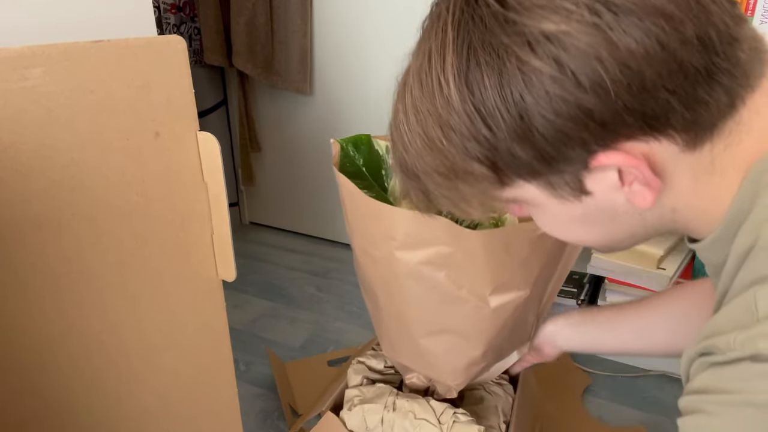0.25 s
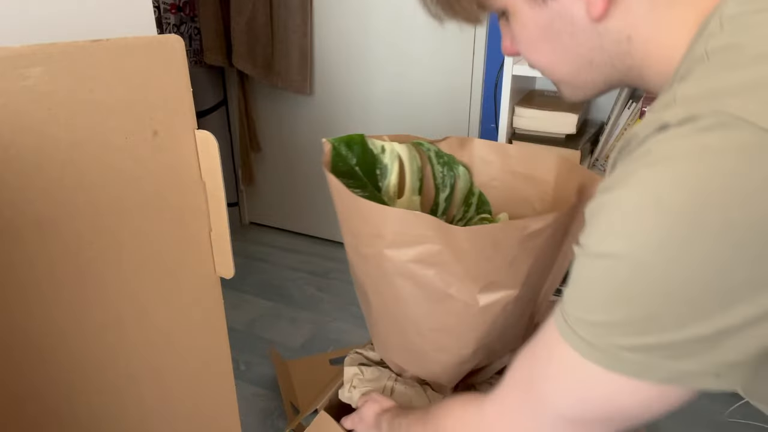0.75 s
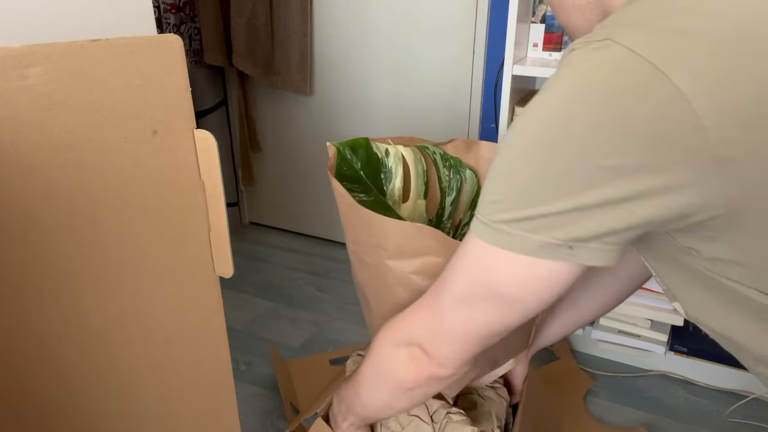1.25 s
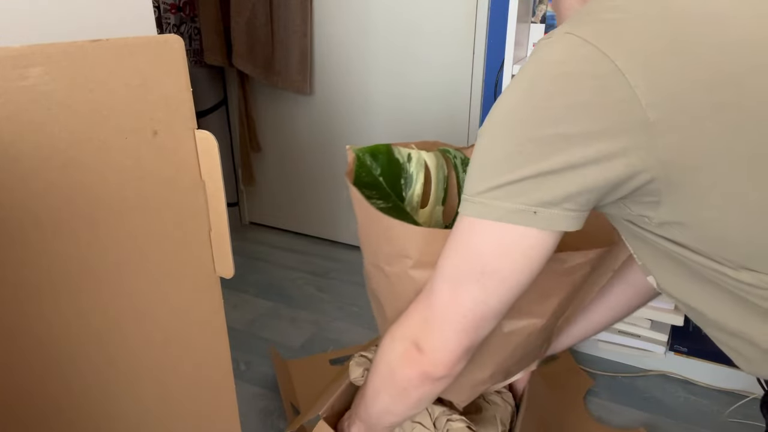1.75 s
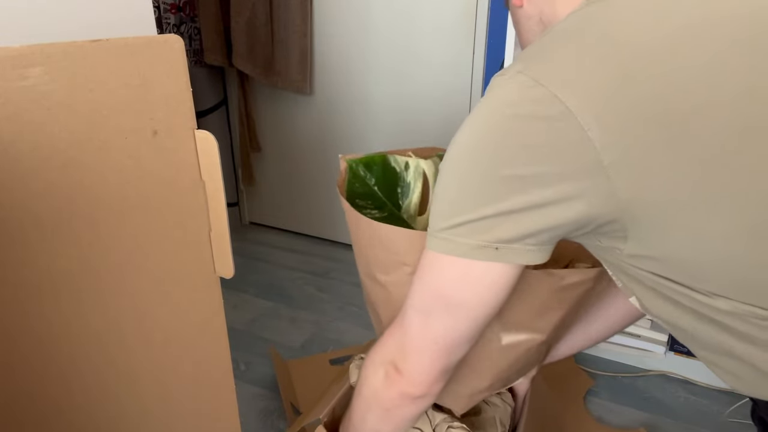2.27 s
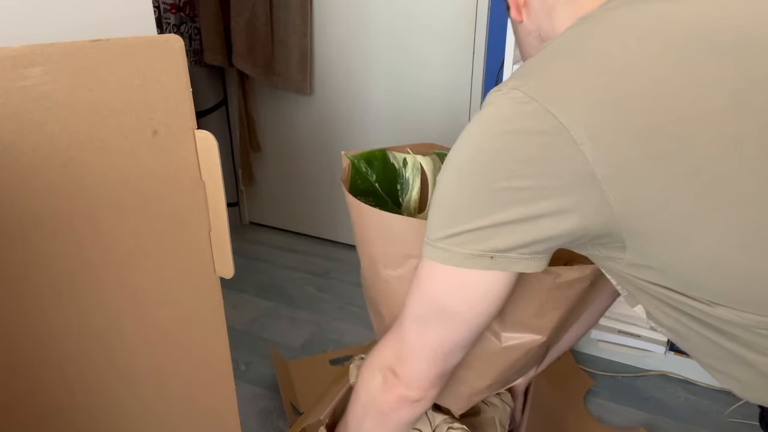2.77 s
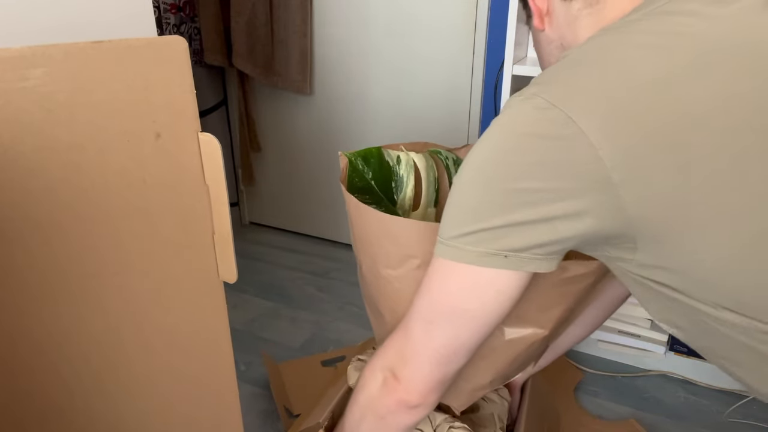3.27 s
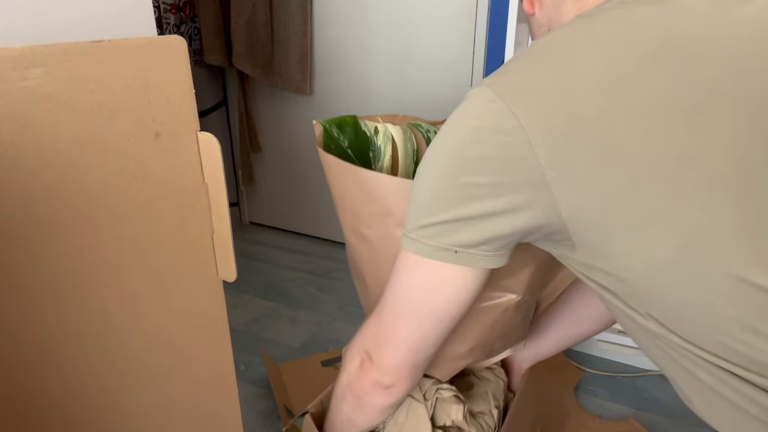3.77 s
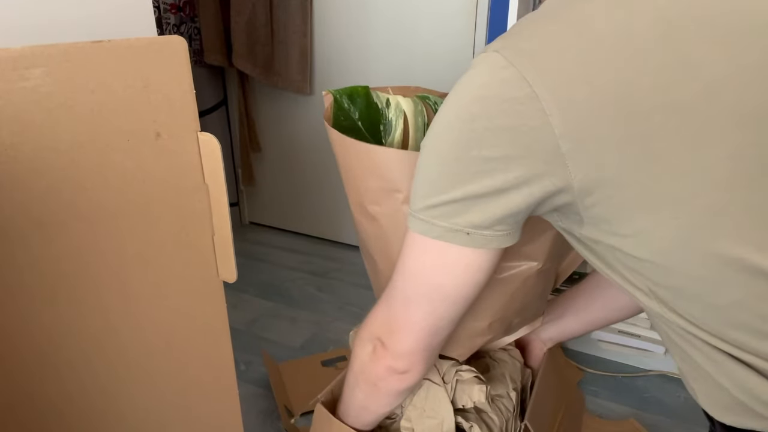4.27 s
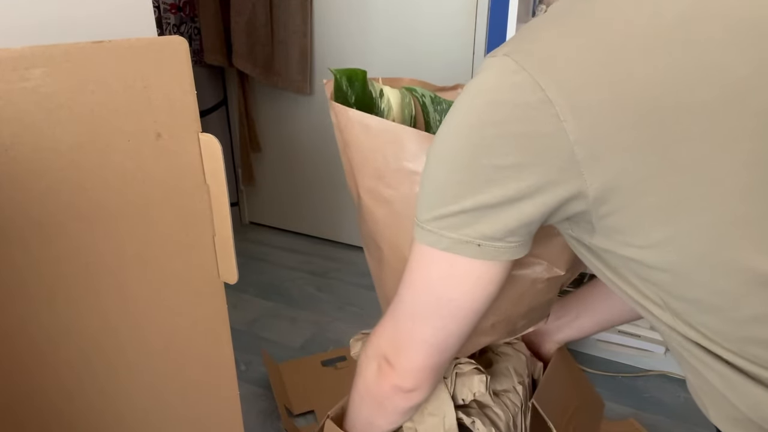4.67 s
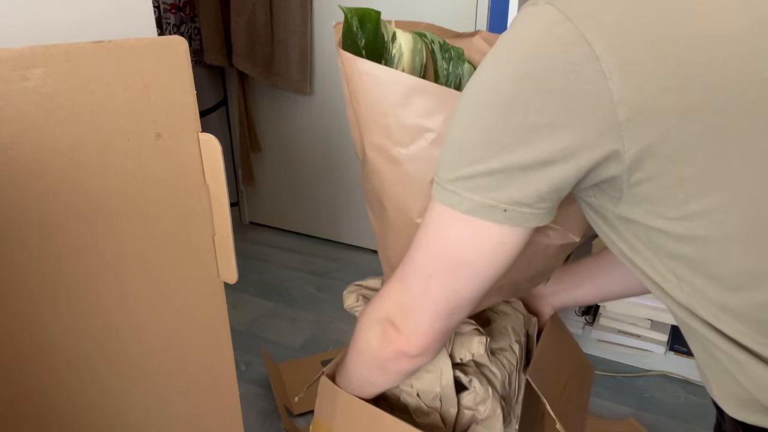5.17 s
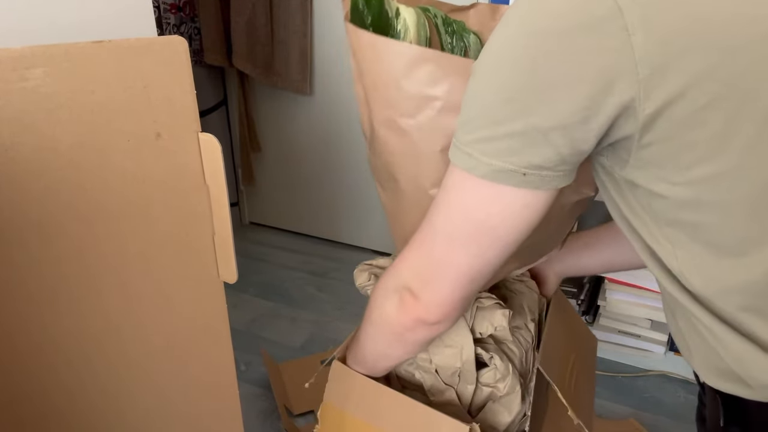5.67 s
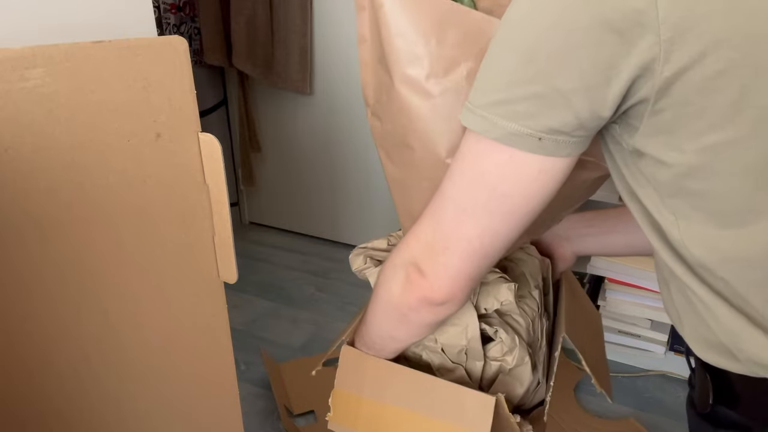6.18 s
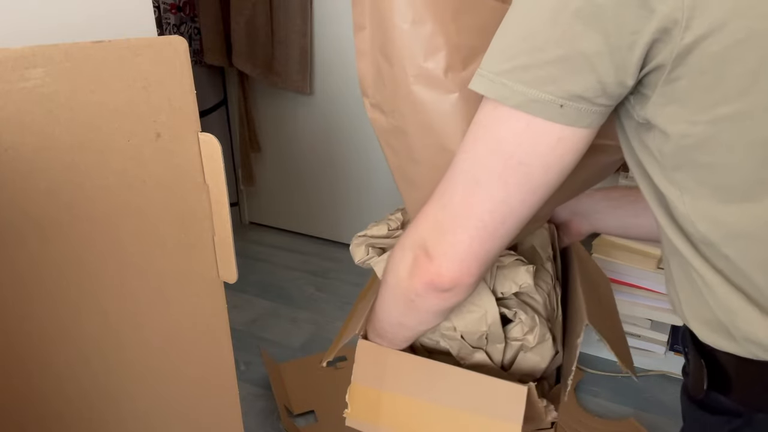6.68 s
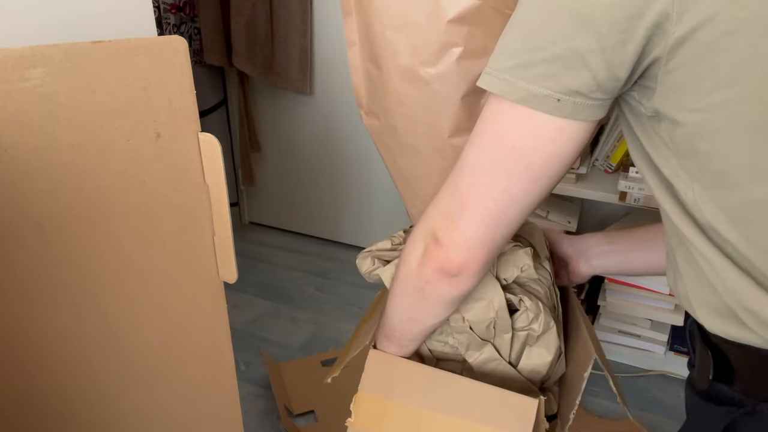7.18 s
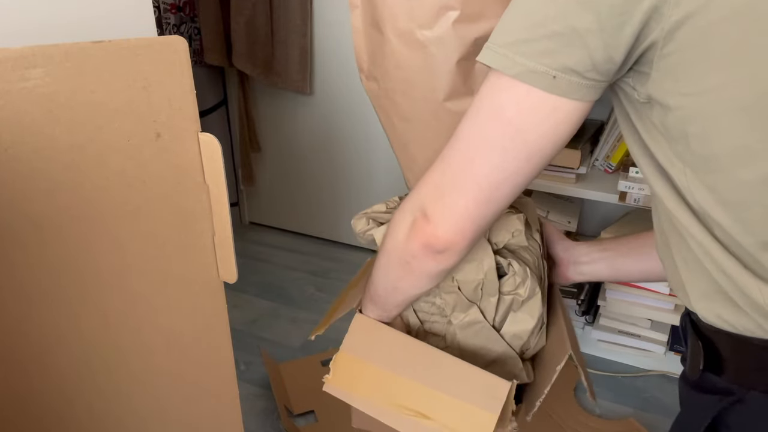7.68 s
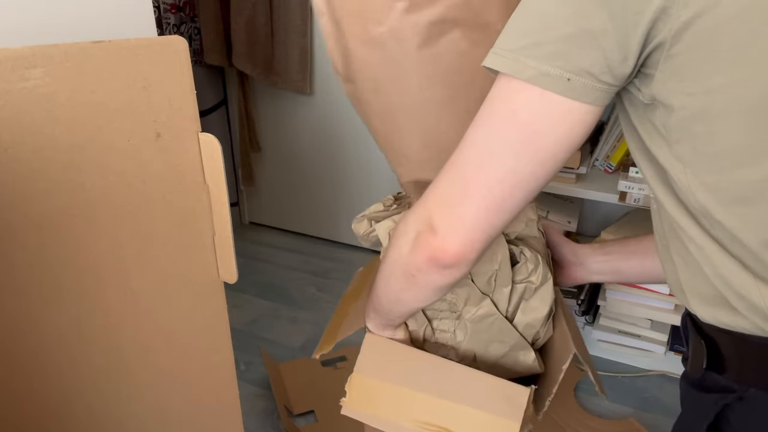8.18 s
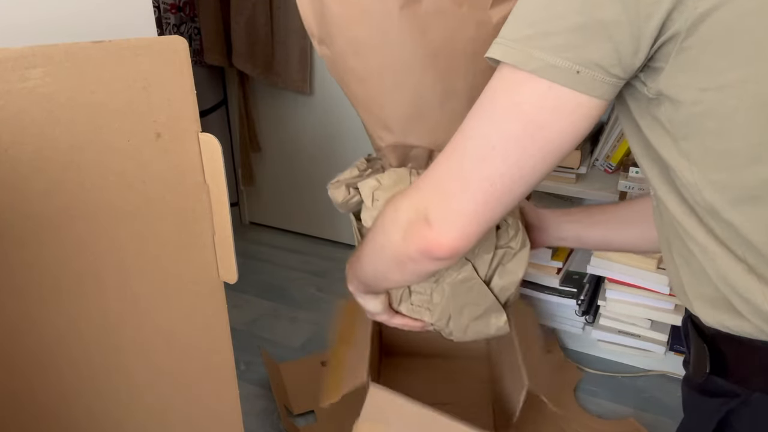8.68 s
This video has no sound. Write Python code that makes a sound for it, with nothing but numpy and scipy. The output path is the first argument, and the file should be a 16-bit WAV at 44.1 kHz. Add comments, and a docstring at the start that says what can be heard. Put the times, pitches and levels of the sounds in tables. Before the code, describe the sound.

Stiff packing paper crinkles continuously but unevenly, in short squeezes and sharp snaps, as someone works a wrapped plant out of a carton. A firmer bump and crunch come early, then quieter rustling with brief lulls. Finally the cardboard box slips free and lands with one strong, boxy thud, rocking slightly. Heard up close in stereo, indoors, with a short room reflection and very low background hiss.

```python
"""In a small room, two hands dig through crumpled packing paper in a cardboard box, which at last drops on the floor.
Paper: random buckling impulses excite banks of resonators over sliding noise; snaps are decaying noise bursts,
and flipping patches are damped tones of sinking pitch.
Box: filtered noise rumbles in the walls; knocks, the last ones landing and rocking, excite damped panel modes.
Decaying random reflections form the room, and a close pair of microphone ports hears it over a faint room tone."""
import sys
import numpy as np
from scipy import signal
from scipy.fft import rfft, irfft
from scipy.io import wavfile
from scipy.ndimage import uniform_filter1d

SR = 44100
rng = np.random.default_rng(int(sys.argv[2]) if len(sys.argv) > 2 else 0)


def wav_record(signal):
    """Record a signal, one row per channel, as 16-bit PCM in the file named by sys.argv[1]."""
    frames = np.transpose(np.atleast_2d(signal))
    bounded = np.clip(frames, -1, 1)
    # unit amplitude maps onto the largest positive 16-bit level
    quanta = np.round(bounded * 32767).astype(np.int16)
    wavfile.write(sys.argv[1], SR, quanta)


N = 394254

# spectrum of the room tone: (f/Hz, relative level/dB)
ROOM_TONE_SPECTRUM = [(60, 4), (300, -2.5), (1340, 8), (4000, -15.5), (8000, -21), (11000, -8),
                      (16000, -15)]
ROOM_TONE_DB = -58    # rms ahead of the port filters
# response of the port pair to the sum: (f/Hz, level/dB); the ports are out of phase near 8 and 15 kHz
SUM_RESPONSE = [(40, -0.5), (6300, 0.5), (7970, -10.5), (8930, -3.5), (10500, 0), (13700, -0.5),
                (14400, -32), (15100, -55), (16400, -55)]
# response of the port pair to the difference: (f/Hz, level/dB)
DIFFERENCE_RESPONSE = [(40, -18.5), (125, -10), (500, -3.5), (2000, -2), (5000, 0.5), (7000, 4.5),
                       (8500, 1), (10000, 3), (11000, -29), (12800, -24), (13600, 4.5), (14500, 0),
                       (16000, 4)]
# balance of the ports: (f/Hz, left minus right level/dB)
PORT_BALANCE = [(60, 3.5), (180, 2.5), (550, 0.5), (1650, 0.5), (4970, 4), (11000, 0), (14000, 0),
                (16500, -0.5)]
MIC_CUT_HZ, STOP_HZ, CEILING = 58, 16500, 0.85    # high-pass; stop-band edge; limit of the rounded peaks

ROOM_T60_S, WALL_CUT_HZ = 0.21, 22000    # decay and low-pass of the reflections
PAPER_ROOM_DB, KNOCK_ROOM_DB = -6.5, -9.5    # reflections against direct sound
KNOCK_SIDE_DB = -4    # knocks are more alike at both ports

# spectrum of the wall rumble: (f/Hz, relative level/dB per Hz)
RUMBLE_SPECTRUM = [(15, -58), (25, 17), (64, 2), (75, 5.5), (163, 1), (198, -1), (252, -0.5), (291, -15.5),
                   (366, -3), (450, -22), (580, -49), (990, -120)]
WALL_DB, WALL_FOLLOWS = -50, 0.48    # rumble at the mean rustle level; share of the rustle's swing in dB
SHAKE_DB, SHAKE_T60_S, SHAKE_CUT_HZ = -11, 0.23, 160    # rumble after a knock, weaker from higher panels
# modes of the box: (f/Hz, relative level/dB, free t60/s)
BOX_MODES = [(80.9, 1.5, 0.65), (108, 11, 0.088), (146.7, 3, 0.16), (165.3, -1, 0.29), (175, 10.5, 0.068),
             (230, 13.5, 0.036), (268.7, 14.5, 0.049), (283, 9, 0.081), (330, 4, 0.049), (420, -0.5, 0.046),
             (550, -6, 0.085), (576, 0.5, 0.09), (700, -3.5, 0.17), (967, 1, 0.088), (1130, -10, 0.046)]
# knocks on the box, last its landing and rocking:
# (t/s, relative level/dB, struck panel f/Hz, spread of modes/octaves, share of free t60)
KNOCK_EVENTS = [(0.099, -26.5, 82, 1.2, 0.7), (0.123, -33, 201, 0.44, 1.16), (0.147, -42, 170, .6, 0.68),
                (0.172, -35, 250, 0.53, 0.71), (0.195, -39, 97, 0.78, 0.89), (0.273, -34, 83, 0.42, 0.65),
                (1.254, -41, 229, 0.87, 1), (1.346, -27.5, 92, 0.24, 0.75), (1.519, -28, 144, 0.45, 0.66),
                (1.625, -13, 260, 0.54, 0.83), (1.632, -22.5, 149, 0.42, 0.64),
                (1.661, -27, 270, 0.36, 0.68), (1.703, -30, 191, 0.61, 0.63), (1.7, -27.5, 103, 0.48, 0.82),
                (1.803, -24.5, 170, 0.68, 0.92), (1.826, -25, 170, 0.5, .6), (1.851, -47, 140, 0.57, 0.62),
                (1.956, -20.5, 101, 0.32, 0.47), (1.992, -30, 85, 0.34, 0.53), (2.653, -38.5, 163, 1, 0.84),
                (2.996, -17.5, 168, 0.7, 0.58), (3, -19, 300, 0.21, 0.83), (4.152, -40, 238, 1.1, 0.87),
                (4.247, -36, 230, .27, 1.1), (4.881, -42, 124, 0.64, 0.6), (5.39, -29, 128, 0.64, 0.47),
                (6.915, -30, 70, 1.6, 0.87), (7.542, -39, 242, 0.34, 1), (8.18, -31, 91, 0.44, .6),
                (8.314, -33, 109, 0.36, 1.3), (8.322, -41, 160, 0.77, 0.4), (8.682, -10, 523, 1.7, 1.3),
                (8.686, -3, 183, 0.34, 0.64), (8.691, -23, 400, 0.26, 0.68),
                (8.701, -12.5, 110, 0.29, 1.05), (8.708, -4, 288, 0.39, 0.74), (8.726, -19, 105, .3, 0.66),
                (8.741, -20, 320, 0.42, 0.87), (8.754, -18, 90, 0.45, 0.62), (8.764, -18, 990, 0.5, 1.5),
                (8.801, -18, 105, 0.2, 1), (8.818, -20, 107, 0.18, 0.69), (8.844, -28, 99, 0.57, 0.56),
                (8.894, -28, 92, 0.3, 0.38)]
PANEL_SHARP, PANEL_SAG_S = 0.296, 0.0105    # initial excess of pitch as a share; its time constant

# steady digging: (t/s, rustle level/dB, crackle against rustle level/dB)
DIGGING_LEVELS = [(0, -47.5, -3), (.6, -49.5, 1), (1.05, -45, -2), (1.8, -48.5, -3), (1.93, -49, -5),
                  (2.02, -52, -0.5), (2.25, -47, -2.5), (2.95, -59.5, 0.5), (3.1, -61, 1.5),
                  (3.3, -54.5, -10), (4.4, -44, -2.5), (4.65, -48.5, -9), (4.9, -57, -2.5),
                  (5.066, -66, -5), (5.2, -51.5, 0), (6.05, -55, -5), (6.4, -54, -3.5), (6.48, -48.5, -16),
                  (7.1, -49.5, -4), (7.33, -49, -5), (7.68, -47, -0.5), (8.04, -52.5, -7),
                  (8.35, -52, -1.5), (8.5, -44, -1), (8.61, -62, -1), (8.68, -74, -2.5), (8.86, -56.5, -1),
                  (8.94, -57, 0)]
# squeezes of the hands: (peak t/s, rustle level/dB, length/s, crackle against rustle level/dB)
SQUEEZE_EVENTS = [(0.109, -37.5, 0.1, -23), (0.18, -40.5, 0.12, -25), (0.311, -40.5, 0.12, -5),
                  (0.43, -38.5, 0.18, -3.5), (0.688, -39.5, 0.078, 4), (0.767, -39, 0.074, -1.5),
                  (1.167, -42, 0.11, -7.5), (1.243, -43.5, 0.35, -12), (1.35, -44.5, 0.21, 4),
                  (1.525, -46.5, 0.089, 4.5), (1.604, -32, .1, -4.5), (1.818, -36.5, 0.098, -6.5),
                  (2.112, -39, 0.16, -4), (2.333, -45, 0.15, -3.5), (2.496, -43.5, 0.33, -1),
                  (2.683, -48.5, 0.11, -4.5), (2.772, -54, 0.14, -21), (2.866, -47, 0.3, -2.5),
                  (3.001, -36, 0.065, -6.5), (3.188, -46.5, 0.14, 1.5), (3.297, -43, 0.28, -5.5),
                  (3.49, -45.5, 0.35, -6), (3.658, -40.5, 0.41, -1.5), (3.76, -47.5, 0.56, -0.5),
                  (3.919, -39, 0.11, -3), (4.096, -44.5, 0.081, 5.5), (4.224, -48, 0.12, -27),
                  (4.324, -41.5, 0.12, -23), (4.404, -44.5, 0.18, -1), (4.51, -42, 0.39, -4),
                  (4.733, -40, 0.2, -2.5), (4.856, -39, 0.13, -5.5), (4.965, -42, 0.18, -9.5),
                  (5.144, -41.5, 0.12, -4.5), (5.327, -45.5, 0.24, 1), (5.443, -44.5, 0.2, 0),
                  (5.564, -45, 0.18, -0.8), (5.74, -50.5, 0.56, -2), (6.022, -48, 0.2, -0.5),
                  (6.147, -44, 0.23, -1), (6.277, -41, 0.15, -6), (6.572, -47, 0.4, 3),
                  (6.695, -37.5, 0.13, -2.5), (6.938, -38, 0.41, -1), (7.132, -42.5, 0.13, -4),
                  (7.206, -39.5, 0.15, -2), (7.508, -40, 0.19, -2), (7.647, -61, 0.1, -14),
                  (7.743, -40, 0.4, -4), (7.958, -40.5, 0.14, -1.5), (8.172, -38, 0.26, 2),
                  (8.319, -49, 0.12, 4), (8.532, -50, 0.096, 6.5), (8.702, -31, 0.059, -4.5),
                  (8.788, -37.5, 0.16, -9.5)]
RISE_SHARE, EDGE_DB, SLOPE_POWER = 0.45, 19.5, 1.59    # share of length spent rising; fall at the ends; curvature

# spectrum of the large sheet patches: (f/Hz, relative level/dB per Hz)
RUSTLE_SPECTRUM = [(150, -25.5), (250, 2), (291, -5.5), (365, -0.5), (543, 2.5), (735, 0.5), (1000, 3.5),
                   (1710, -3), (2400, -10), (3120, -14), (5280, -43)]
# spectrum of the small facets and creases: (f/Hz, relative level/dB per Hz)
CRACKLE_SPECTRUM = [(820, -5.5), (1400, 3.5), (1700, -1), (3120, 0), (5500, -2), (6290, -3), (8000, -2.5),
                    (10900, -5), (13600, -8.5), (16400, -11)]
# pitch around which patches gain or lose level: (t/s, f/Hz, lift level/dB)
FAVOURED_PITCHES = [(0, 1010, 4), (.12, 600, 5), (.55, 831, 2.5), (.89, 625, 1), (1.34, 900, -3),
                    (1.6, 600, 13.5), (1.69, 464, 9), (1.8, 696, 7), (3.21, 575, 8), (3.29, 958, 3),
                    (3.44, 565, -1), (3.83, 780, 7), (3.88, 627, 0), (4.35, 700, 2.5), (4.45, 1200, 2),
                    (4.6, 1200, -2), (4.75, 1260, 8.5), (5.0, 1230, 3.5), (5.15, 1250, -1), (5.3, 755, 5),
                    (6.3, 840, 5), (6.7, 710, 1.5), (7.5, 770, 2), (7.55, 597, 1), (8.34, 915, 10.5),
                    (8.39, 654, 12.5), (8.54, 816, 11), (8.69, 460, 13), (8.94, 830, -5)]
FAVOURED_OCTAVES = 0.21    # width of that lift
# treble of the paper, raised or lowered by a broad shelf: (t/s, level/dB)
TREBLE_LEVELS = [(0, 2.5), (.5, 1), (1, 0), (2, 3.5), (2.9, 0), (3.2, -3), (3.5, -3), (4, 0), (4.5, -2.5),
                 (5, 1), (6, -1), (6.5, -1.5), (7, -1.5), (7.7, 0.5), (8, 0), (8.2, -6.5), (8.5, -1),
                 (8.94, 1)]

# flat patches that flip: (t/s, relative level/dB, settled f/Hz)
POP_EVENTS = [(.099, -16, 654), (.199, -21.5, 394), (.2017, -27, 1485), (0.314, -29.5, 560),
              (.416, -20.5, 642), (.68, -28, 586), (.753, -32, 500), (.839, -26.5, 547), (1.236, -27, 1140),
              (1.341, -24, 360), (1.401, -21.5, 700), (1.482, -24, 960), (1.526, -17.5, 517),
              (1.58, -19, 603), (1.596, -24, 980), (1.602, -29, 555), (1.624, -9.5, 371), (1.802, -18, 667),
              (2.095, -22, 396), (2.305, -25, 494), (2.482, -26, 840), (2.741, -29, 664), (2.762, -20, 576),
              (2.855, -26, 576), (2.998, -18.5, 660), (3.163, -28, 440), (3.281, -26, 970),
              (3.417, -22.5, 567), (3.61, -29, 885), (3.882, -23, 540), (4.079, -24, 648),
              (4.2515, -30, 1310), (4.266, -35, 1600), (4.302, -22, 716), (4.311, -24, 420),
              (4.483, -31, 1200), (4.6, -31, 1190), (4.69, -27, 1220), (4.735, -30, 1280),
              (4.851, -26, 1210), (4.856, -24, 570), (4.878, -28, 1195), (4.882, -26, 590),
              (4.945, -33.5, 1180), (5.134, -27, 1210), (5.755, -26.5, 740), (6.018, -29.5, 1476),
              (6.53, -30.5, 546), (6.567, -28, 1215), (6.646, -25.5, 586), (6.69, -24, 904),
              (6.9151, -20.5, 894), (6.926, -31, 1034), (6.973, -34, 1116), (7.098, -25, 866),
              (7.463, -28, 1094), (7.526, -28, 590), (7.629, -20, 700), (7.643, -29, 590),
              (7.792, -22, 667), (8.684, 2, 500), (8.693, -6, 420), (8.744, -15, 340), (8.764, -21, 1030),
              (8.778, -23, 1000)]
POP_T60_S, POP_SHARP, POP_SAG_S = 0.048, 0.13, 0.0031    # decay; initial excess of pitch; its time constant
# creases that snap: (t/s, relative crack level/dB, relative sheet level/dB, shower t60/s,
# shower against crack level/dB, facet f/Hz)
SNAP_EVENTS = [(0.0862, -33, -28.5, 0.1, -14, 3700), (0.0977, -38, -27, 0.065, -17, 2020),
               (0.169, -40, -33, 0.11, -12, 2200), (0.2012, -29.5, -41, 0.1, -10, 10900),
               (0.2903, -34, -39, 0.14, -7, 1930), (0.3461, -43, -43, 0.12, -11, 5590),
               (0.4116, -30, -28, 0.075, -8, 2880), (0.4708, -30.5, -50, 0.2, -3, 3860),
               (0.5524, -29, -51, 0.13, -8.5, 5560), (0.6606, -34, -36, 0.12, -12, 5600),
               (0.6764, -32, -26.5, 0.1, -7.5, 3040), (0.7551, -30, -46, 0.13, -3.5, 2990),
               (0.833, -35.5, -36, 0.089, -3, 4600), (0.9013, -39, -51, 0.12, -12, 1950),
               (1.1127, -32.5, -25.5, 0.14, -14.5, 3220), (1.2335, -16.5, -20.5, 0.044, -17, 3600),
               (1.3007, -29.5, -33, 0.097, -7, 1940), (1.339, -30, -31, 0.16, -2.5, 2630),
               (1.4, -32, -29.5, 0.17, -7.5, 2650), (1.479, -32.5, -29.5, 0.11, -8, 1940),
               (1.5173, -37, -33, 0.13, -10, 2700), (1.5771, -36, -28, 0.12, -7, 3640),
               (1.5907, -18.5, -20, 0.11, -8, 2170), (1.7211, -39.5, -41, 0.21, -4, 1900),
               (1.7896, -36, -33, 0.12, -7, 2030), (1.7997, -37, -28, 0.16, -7, 1930),
               (1.8585, -35, -52, 0.13, -10, 2300), (1.9806, -39, -38, 0.12, -10, 2050),
               (2.0656, -46, -46, 0.12, -12, 2250), (2.0914, -43, -33, 0.12, -10, 5230),
               (2.2117, -37, -41, 0.13, -8, 2930), (2.2263, -32, -45, 0.11, -12, 4970),
               (2.2982, -42, -42, 0.12, -7, 2950), (2.318, -39, -41, 0.14, -4, 2690),
               (2.461, -27, -42, 0.094, -14, 3100), (2.528, -34.5, -42, 0.12, -14, 3200),
               (2.598, -39, -38, 0.098, -13, 1900), (2.6663, -38.5, -47, 0.098, -14, 2850),
               (2.7075, -39, -52, 0.12, -16, 3860), (2.739, -38, -33, 0.096, -10, 1940),
               (2.7622, -42, -34.5, 0.1, -13, 2450), (2.858, -37, -34, 0.075, -4.5, 3200),
               (2.995, -23, -31, 0.064, -27, 2700), (3.147, -41, -40, 0.13, -9, 3120),
               (3.1663, -21.5, -46, 0.089, -7.5, 3250), (3.2835, -33.5, -31.5, 0.14, -8.5, 2300),
               (3.334, -37, -34, 0.12, -13, 2710), (3.4188, -36, -30.5, 0.14, -12, 2050),
               (3.4647, -38, -33, 0.13, -8, 1920), (3.4831, -34, -33, 0.11, -8, 3200),
               (3.524, -37, -33, 0.12, -8, 3240), (3.5754, -23.5, -34, 0.094, -8, 3120),
               (3.6105, -22, -49, 0.091, -18, 3360), (3.729, -31, -47, 0.12, -15, 3670),
               (3.7714, -32, -34.5, 0.27, -6, 2910), (3.8433, -41, -45, 0.12, -16, 2890),
               (3.8776, -30.5, -38, 0.067, -11, 3620), (3.9102, -34.5, -57, 0.11, -13, 3870),
               (4.0366, -36.5, -40, 0.12, -2.5, 5010), (4.082, -25.5, -33, 0.088, -9, 4450),
               (4.2507, -29, -40, 0.082, -8, 2120), (4.302, -32.5, -42, 0.095, -15, 2080),
               (4.635, -37, -45, 0.086, -17, 4600), (4.687, -26.5, -42, 0.1, -14, 2870),
               (4.7346, -34, -41, 0.12, -11, 2350), (4.7923, -38.5, -38, 0.23, -5, 3230),
               (4.878, -45, -30, 0.11, -16, 1960), (4.9362, -35.5, -43, 0.12, -8, 2330),
               (5.091, -44, -37.5, 0.11, -4, 3450), (5.1276, -38.5, -46, 0.12, -2, 6130),
               (5.387, -35, -35, 0.12, -9, 3100), (5.4341, -26.5, -52, 0.15, -9, 2130),
               (5.7526, -39.5, -35.5, 0.11, -13, 2320), (5.7977, -36.5, -42, 0.16, -9, 2520),
               (5.9088, -40.5, -45, 0.14, -6, 2670), (6.0185, -36, -51, 0.12, -9, 2500),
               (6.0647, -37.5, -45, 0.13, -3, 2170), (6.138, -32.5, -40, 0.15, -12, 3700),
               (6.1548, -24, -37, 0.15, -11.5, 2040), (6.242, -34, -33, 0.18, -7, 2920),
               (6.253, -26.5, -30, 0.067, -17, 2020), (6.3157, -37.5, -50, 0.12, -7, 2930),
               (6.364, -43, -41, 0.12, -10, 2600), (6.4923, -28, -51, 0.085, -17, 2070),
               (6.526, -28.5, -38, 0.09, -13, 4400), (6.555, -34, -48, 0.13, -7, 1940),
               (6.6122, -28, -50, 0.097, -19, 6080), (6.642, -28.5, -33, 0.12, -5.5, 2280),
               (6.686, -25, -46, 0.12, -8.5, 2320), (6.807, -50, -38, 0.19, -7, 3030),
               (6.8897, -31.5, -31.5, 0.27, -8, 2670), (6.9129, -21, -22.5, 0.15, -8.5, 3330),
               (7.0994, -27.5, -35, 0.12, -13, 3500), (7.4943, -35, -46, 0.1, -12, 3000),
               (7.537, -29.5, -45, 0.093, -9, 4000), (7.6264, -45, -38, 0.091, -19, 2030),
               (7.663, -41, -47, 0.12, -12, 2880), (7.7887, -28, -34, 0.15, -7, 4860),
               (7.889, -31.5, -34, 0.51, -8, 3040), (8.0505, -41.5, -43, 0.21, -11, 2060),
               (8.1514, -32, -45, 0.15, -16, 1930), (8.1694, -23.5, -46, 0.19, -8.5, 1980),
               (8.321, -35, -35, 0.25, -7.5, 5430), (8.6805, -16, -13, 0.063, -8, 2300),
               (8.761, -40, -25, 0.083, -10, 2080), (8.78, -28.5, -31, 0.12, -15, 2870),
               (8.884, -37, -52, 0.13, -9, 11600)]
FACET_T60_S, FACET_SHARE = 0.02, 0.55    # ring of the facet beside a snap
TICK_DB, TICK_S = 5, 0.0003    # first instant against the crack; its time constant
SNAP_CUT_HZ, SNAP_CUT_AT_DB, SNAP_BRIGHTENS = 13000, -37.5, 0.54    # cut-off at this level; its dB rise per dB


def from_db(db):
    """Level in decibels is 20 times the logarithm of the amplitude gain."""
    return 10 ** (np.asarray(db) / 20)


def rms_one(x):
    """Normalisation by signal power: the rms becomes 1."""
    return x / np.sqrt(np.mean(x ** 2) + 1e-20)


def colour(x, spectrum):
    """Minimum-phase filtering: folding the cepstrum makes a causal filter from levels over log frequency."""
    size = 8192
    hz, db = np.transpose(spectrum)
    bins_hz = np.fft.rfftfreq(size, 1 / SR)
    curve_db = np.interp(np.log(bins_hz + 1), np.log(hz), db)
    cepstrum = irfft(np.log(from_db(curve_db)))
    cepstrum[1:size // 2] *= 2
    cepstrum[size // 2 + 1:] = 0
    impulse_response = irfft(np.exp(rfft(cepstrum)))
    return signal.fftconvolve(x, impulse_response)[:len(x)]


def ring(clicks, hz, t60):
    """Damped resonance: each unit click excites an exponentially decaying sine of initial amplitude 1."""
    radius = from_db(-60 / (t60 * SR))
    angle = 2 * np.pi * hz / SR
    feedback = [1, -2 * radius * np.cos(angle), radius * radius]
    return signal.lfilter([0, np.sin(angle)], feedback, clicks + 1e-18)


def sagging(hz, t, share, seconds):
    """Relaxing stiffness: the phase of a tone that starts sharp by a share and sinks exponentially to hz."""
    return 2 * np.pi * hz * (t - share * seconds * np.expm1(-t / seconds))


def lowpass(x, order, hz):
    """Butterworth low-pass: a flat pass band with a smooth fall above the cut-off."""
    return signal.sosfilt(signal.butter(order, hz, fs=SR, output="sos"), x)


def room_tone():
    """Stationary background noise: random pressure with a fixed spectrum."""
    return from_db(ROOM_TONE_DB) * rms_one(colour(rng.standard_normal(N), ROOM_TONE_SPECTRUM))


def ports(mid, side):
    """Sum-and-difference pickup: two filtered components combine into left and right pressures."""
    mid, side = colour(mid, SUM_RESPONSE), colour(side, DIFFERENCE_RESPONSE)
    left = colour(mid + side, [(hz, db / 2) for hz, db in PORT_BALANCE])
    right = colour(mid - side, [(hz, -db / 2) for hz, db in PORT_BALANCE])
    return np.array([left, right])


def room(x, count, wander_hz, room_db):
    """Reverberation: sound wanders between spots, each with its own decaying reflections in sum and difference."""
    t = np.arange(SR // 2) / SR
    out = np.array([x, 0 * x])
    # an extra second lets the slow noise settle
    shares = lowpass(rng.standard_normal((count, N + SR)), 2, wander_hz)[:, SR:]
    for share in shares / np.linalg.norm(shares, axis=0):
        tails = rng.standard_normal((2, len(t))) * from_db(-60 * t / ROOM_T60_S) * (t > 0.004)
        tails = lowpass(tails, 1, WALL_CUT_HZ)
        tails *= from_db(room_db) / np.linalg.norm(tails, axis=1, keepdims=True)
        # the difference hears the direct sound scattered by the housing
        scatter = rng.standard_normal(len(t)) * np.exp(-t / 0.00081)
        tails[1] += scatter / np.linalg.norm(scatter)
        out += signal.oaconvolve((share * x)[None], tails, axes=1)[:, :N]
    return out / np.hypot(1, from_db(room_db))


def handling():
    """Addition of powers: squeezes swell over the digging; the walls follow the rustle and shake after knocks."""
    t = np.arange(0, N + 64, 64) / SR
    s, db, crackle_db = np.transpose(DIGGING_LEVELS)
    digging = from_db(np.interp(t, s, db)) ** 2
    digging_crackle = from_db(np.interp(t, s, db + crackle_db)) ** 2

    s, db, length, crackle_db = np.transpose(SQUEEZE_EVENTS)[:, :, None]
    side_share = np.where(t < s, RISE_SHARE, 1 - RISE_SHARE)
    away = np.abs(t - s) / (length * side_share)    # 1 at either end of the squeeze
    squeezes = from_db(db - EDGE_DB * away ** SLOPE_POWER) ** 2
    rustle_power = digging + squeezes.sum(0)
    crackle_power = digging_crackle + (squeezes * from_db(crackle_db) ** 2).sum(0)

    s, db, hz = np.transpose(KNOCK_EVENTS)[:3, :, None]
    decay = from_db(db + SHAKE_DB - 60 * np.abs(t - s) / SHAKE_T60_S) ** 2
    shakes = (t > s) * decay / (1 + (hz / SHAKE_CUT_HZ) ** 4)
    swing = rustle_power / np.exp(np.log(rustle_power).mean())
    rumble_power = from_db(WALL_DB) ** 2 * swing ** WALL_FOLLOWS + shakes.sum(0)
    powers = (rustle_power, crackle_power, rumble_power)
    return [np.interp(np.arange(N) / SR, t, np.sqrt(power)) for power in powers]


def wall_rumble(level):
    """Forced vibration: the box walls respond to handling as low-frequency noise."""
    return level * rms_one(colour(rng.standard_normal(N), RUMBLE_SPECTRUM))


def knocks():
    """Modal excitation: a knock drives the modes near the struck panel's pitch; hands and floor alter the ring."""
    out, t = np.zeros(N), np.arange(SR // 2) / SR
    hz, level_db, t60 = np.transpose(BOX_MODES)[:, :, None]
    spread_db = rng.normal(0, 1.6, (len(KNOCK_EVENTS), len(BOX_MODES), 1))
    for (s, knock_db, panel_hz, octaves, ringing), luck_db in zip(KNOCK_EVENTS, spread_db):
        at = round(s * SR)
        distance = np.log2(hz / panel_hz) / octaves
        strength_db = knock_db + level_db - 8.5 - 6 * distance ** 2 + luck_db
        modes = from_db(strength_db - 60 * t / (t60 * ringing))
        modes *= np.sin(sagging(hz, t, PANEL_SHARP, PANEL_SAG_S))
        modes *= -np.expm1(-t * hz / 0.24)    # cardboard yields: each mode swells over part of a cycle
        knock = modes[::2].sum(0) - modes[1::2].sum(0)    # neighbours start opposed
        out[at:at + len(t)] += knock[:N - at]
    return lowpass(out, 1, 1500)


def buckling(per_s, size_db, clump_db, clump_hz):
    """Stochastic instability: creases give way at random in clumps, a few far louder than the rest."""
    clump = rms_one(lowpass(rng.standard_normal(N), 2, clump_hz))
    born = rng.random(N) < per_s * from_db(clump_db * clump) / SR
    size = from_db(size_db * np.minimum(rng.exponential(1, N), 4.5))
    return born * size * rng.choice([-1, 1], N)


def patches(creases, low_hz, high_hz, cycles, count):
    """Local resonance: each crease rings one of several patches, its level lifted or cut near a moving pitch."""
    dealt = rng.integers(0, count, N)
    s, favoured_hz, lift_db = np.transpose(FAVOURED_PITCHES)
    t, out = np.arange(N) / SR, np.zeros(N)
    for k, hz in enumerate(np.geomspace(low_hz, high_hz, count)):
        at = np.flatnonzero((dealt == k) & (creases != 0))
        away = np.log2(hz / np.interp(t[at], s, favoured_hz)) / FAVOURED_OCTAVES
        lift = from_db(np.interp(t[at], s, lift_db) * np.exp(-away ** 2))
        clicks = np.zeros(N)
        clicks[at] = creases[at] * lift
        out += ring(clicks, hz, cycles / hz) * np.sqrt(hz)    # cycles are counted to -60 dB
    return rms_one(out)


def rustle(creases, slide):
    """Resonance and friction: large patches of the sheet ring over sliding noise."""
    rings = patches(creases, low_hz=300, high_hz=2170, cycles=8.4, count=14)
    return rms_one(colour(rings + slide * rng.standard_normal(N), RUSTLE_SPECTRUM))


def crackle(creases, slide, click):
    """Impulsive radiation: creases click and their facets ring over the hiss of paper sliding on paper."""
    rings = patches(creases, low_hz=1815, high_hz=13170, cycles=67.0, count=18)
    clicks = click * rms_one(creases)
    return rms_one(colour(rings + clicks + slide * rng.standard_normal(N), CRACKLE_SPECTRUM))


def pops():
    """Snap-through buckling: a patch flips and rings, hollow, at a sinking pitch with a weaker overtone."""
    out, t = np.zeros(N), np.arange(SR // 8) / SR
    for s, pop_db, hz in POP_EVENTS:
        at = round(s * SR)
        phase = sagging(hz, t, POP_SHARP, POP_SAG_S)
        tone = np.sin(phase) + 0.21 * np.sin(1.2 * phase)
        envelope = from_db(pop_db - 5.5 - 60 * t / POP_T60_S) * -np.expm1(-t / 0.00067)
        out[at:at + len(t)] += (envelope * tone)[:N - at]
    return out


def snaps():
    """Sudden energy release: a crack rings its facet, smaller slips follow, and the sheet answers lower and later."""
    crack, sheet, t = np.zeros(N), np.zeros(N), np.arange(SR // 4) / SR
    noise = rng.standard_normal((len(SNAP_EVENTS), 3, len(t)))
    for (s, crack_db, sheet_db, t60, shower_db, hz), (high, low, chance) in zip(SNAP_EVENTS, noise):
        at = round(s * SR)
        slips = rms_one(uniform_filter1d(chance, size=90))    # the shower comes unevenly
        tick = from_db(TICK_DB) * np.exp(-t / TICK_S)
        shower = from_db(shower_db - 60 * t / t60 + 0.96 * slips)
        envelope = tick + np.exp(-t / 0.003) + shower
        facet = rms_one(ring(high, hz, t60=FACET_T60_S))
        sharp = from_db(crack_db) * envelope * (np.sign(high) + FACET_SHARE * facet)
        # one-pole low-pass: weak snaps are duller
        cut_hz = SNAP_CUT_HZ * from_db(SNAP_BRIGHTENS * (crack_db - SNAP_CUT_AT_DB))
        pole = np.exp(-2 * np.pi * cut_hz / SR)
        crack[at:at + len(t)] += signal.lfilter([1 - pole], [1, -pole], sharp)[:N - at]
        answer = from_db(sheet_db) * envelope * low * -np.expm1(-t / 0.0063)
        sheet[at:at + len(t)] += answer[:N - at]
    return from_db(-7) * colour_unit(crack, CRACKLE_SPECTRUM) + from_db(3) * colour_unit(sheet, RUSTLE_SPECTRUM)


def colour_unit(x, spectrum):
    """Energy normalisation: colours x with an impulse response of unit energy."""
    impulse = np.eye(1, 8192)[0]
    return colour(x, spectrum) / np.linalg.norm(colour(impulse, spectrum))


def paper(rustle_level, crackle_level):
    """Superposition: rustle, crackle and snaps add up, then a varying high-frequency shelf sets the treble."""
    creases = buckling(per_s=1800, size_db=2.0, clump_db=2.5, clump_hz=21.6)
    sound = rustle_level * rustle(creases, slide=0.93)
    sound += crackle_level * crackle(creases, slide=0.81, click=1.94)
    sound += snaps()
    treble = signal.sosfiltfilt(signal.butter(2, 8500, "high", fs=SR, output="sos"), sound)
    gain = from_db(np.interp(np.arange(N) / SR, *np.transpose(TREBLE_LEVELS)))
    return sound + treble * (gain - 1)


def scene():
    """Linear superposition: room tone, box and paper add in the room and reach the two ports."""
    rustle_level, crackle_level, rumble_level = handling()
    rumble = wall_rumble(rumble_level)
    struck = room(knocks(), count=4, wander_hz=6.3, room_db=KNOCK_ROOM_DB)
    handled = paper(rustle_level, crackle_level) + pops() + rumble
    heard = room(handled, count=9, wander_hz=7.27, room_db=PAPER_ROOM_DB)
    mid, side = heard + struck * from_db([[0], [KNOCK_SIDE_DB]])
    return ports(mid + room_tone(), side)


def record(dry):
    """Band limits and saturation: deep bass is removed, the loudest peaks are rounded and the top is cut."""
    dry = signal.sosfilt(signal.butter(5, MIC_CUT_HZ, "high", fs=SR, output="sos"), dry)
    rounded = CEILING * np.tanh(dry / CEILING)
    return signal.sosfilt(signal.cheby2(24, 70, STOP_HZ, fs=SR, output="sos"), rounded)


dry = scene()
out = record(dry)
wav_record(out)
```